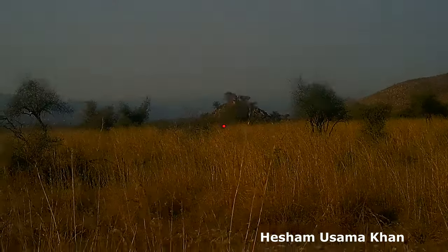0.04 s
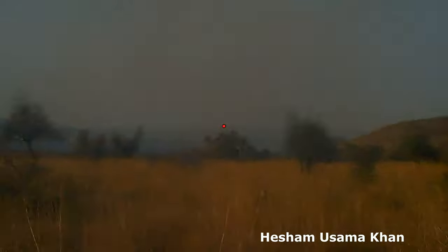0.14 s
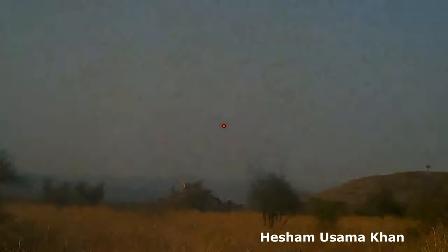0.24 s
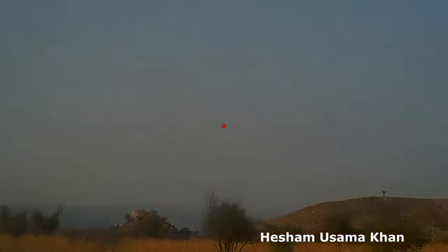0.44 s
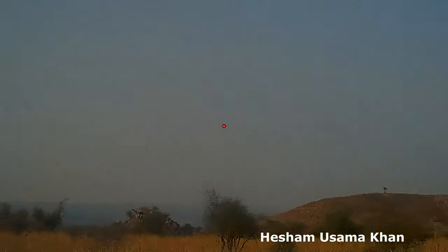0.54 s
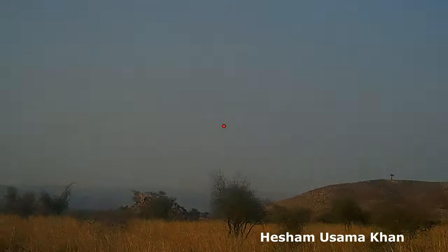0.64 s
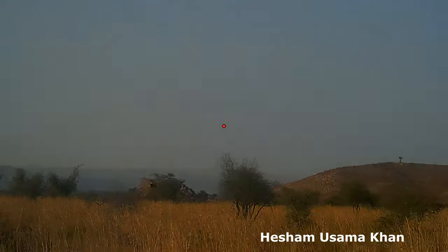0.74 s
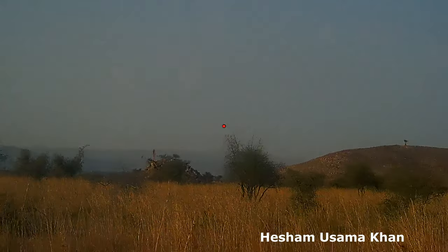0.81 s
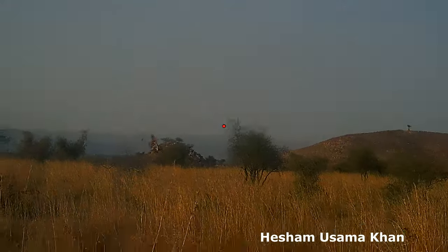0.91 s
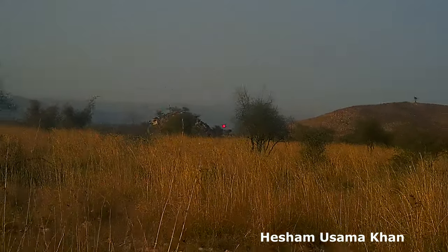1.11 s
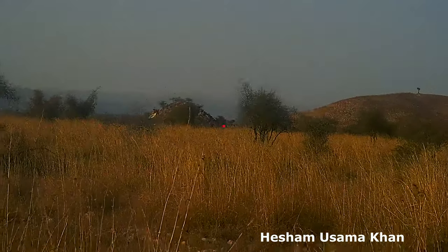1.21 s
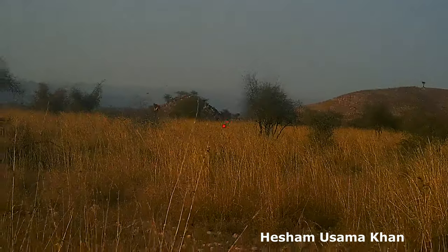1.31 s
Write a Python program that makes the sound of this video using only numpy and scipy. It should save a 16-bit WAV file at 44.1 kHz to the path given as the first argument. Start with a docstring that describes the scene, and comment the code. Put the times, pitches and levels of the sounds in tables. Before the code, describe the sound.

One loud, distorted shotgun blast goes off in open country, heard from the gun itself. Sliding metal and sharp clacks follow, then a dull closing knock and a fading rumble with faint metallic ringing.

```python
"""In open country, a shotgun fires once, heard from a microphone fixed to the gun.
The hammer falls, then a crack and a roaring blast overload the microphone. The action (the moving
steel parts) scrapes, clacks and knocks shut, shaking the stock. A low rumble, thin ringing from the
spring and barrel, and soft rubs of a hand follow, over faint wind."""
import sys
import numpy as np
from scipy import signal
from scipy.fft import rfft, irfft
from scipy.io import wavfile
from scipy.ndimage import uniform_filter1d

SR = 44100
rng = np.random.default_rng(int(sys.argv[2]) if len(sys.argv) > 2 else 0)


def persist_wave(psi):
    """Save psi, clipped to +-1, as 16-bit WAV."""
    counts = np.round(np.clip(psi, -1, 1) * 32767).astype(np.int16)
    wavfile.write(sys.argv[1], SR, np.atleast_2d(counts).T)


N = 59535

# The tone of each noise. Each row: frequency in Hz, relative strength in dB.
CRACK_TONE = [(100, -6), (600, 2.5), (1100, 0), (1800, -5.5), (3500, -10), (7000, -14.5), (14000, -25)]
BLAST_TONE = [(25, -12), (70, -5.5), (160, -1.5), (300, -13.5), (700, -16), (1500, -27), (3500, -36.5),
              (7000, -41.5), (14000, -54.5)]
KNOCK_TONE = [(30, -1), (100, -4), (250, -9), (400, 1), (750, -7), (1000, -7.5), (1600, -23), (2200, -22),
              (3300, -27), (6000, -34), (12000, -51)]
KNOCK_TAIL_TONE = [(100, -9.5), (310, -15), (440, 1), (740, 1), (1000, -12.5), (1600, -25), (2200, -18),
                   (3300, -30.5), (6000, -33), (8000, -38.5), (12000, -50)]
RUMBLE_TONE = [(25, -17.5), (60, -13), (92, -3.5), (125, -2.5), (172, 1), (230, -10.5), (280, -27.5),
               (400, -46)]
RUB_TONE = [(150, -9), (330, -8.5), (480, 4.5), (820, -1), (1150, -12.5), (1700, -27), (5000, -39),
            (12000, -61)]
WIND_TONE = [(15, -0.5), (30, -13), (60, -21.5), (170, -27), (300, -38), (800, -37), (2000, -42.5),
             (7000, -47.5), (14000, -72)]
# Where the steel action rings. Each row: frequency in Hz, width in Hz, relative level in dB.
STEEL_RESONANCES = [(508, 29, -3.5), (719, 50, -1.5), (800, 83, 2), (1463, 82, -6), (1673, 170, -4.5),
                    (2235, 40, -13), (2788, 270, -10), (3770, 270, -13), (4716, 140, -15),
                    (6310, 320, -19.5), (7250, 700, -22.5)]
# Where the stock and microphone mount ring. Each row: frequency in Hz, width in Hz, relative level in dB.
STOCK_RESONANCES = [(87.8, 30.1, -3), (171.4, 22, 0.5), (214.3, 16, -8)]
# Metal hitting metal. Each row: start in seconds, level in dB, fade time in seconds,
# brightness in dB per octave.
CLACKS = [(.329, -2.5, 0.1, 5), (0.409, -10, 0.039, 1.5), (.426, -15.5, .05, 2.5), (0.4713, -6, 0.044, 3),
          (.486, -22.5, 0.053, 1.5), (0.522, -10.5, 0.057, -1.5), (.551, -10, .06, -0.5),
          (0.576, 9.5, 0.094, 6), (.607, 7.5, 0.14, 4.5)]
# Blows that shake the stock. Each row: start in seconds, level in dB, fade time in seconds.
THUMPS = [(.195, -19.5, .15), (.293, -0.5, 0.19), (.609, 12.5, 0.16), (0.7593, 0.5, 0.56)]
# The action sliding. Each row: time in seconds, scrape level in dB, stock shudder level in dB.
SLIDE_LEVELS = [(0.299, -36, -26.5), (.34, -15, -9.5), (.41, -16.5, -9.5), (.46, -20.5, -9.5),
                (.50, -23, -9), (.54, -21, -13.5), (0.573, -10, -9), (.62, -14, -15.5), (0.699, -47, -35),
                (0.762, -53.5, -32)]
# The lingering rumble. Each row: time in seconds, level in dB.
RUMBLE_LEVELS = [(.80, -27), (.90, -21), (1.02, -17.5), (1.091, -26.5), (1.16, -24), (1.24, -30),
                 (1.35, -36.5)]
# Notes of the spring and barrel. Each row: pitch in Hz, level in dB, fade time in seconds.
SPRING_NOTES = [(440, -27.5, .45), (560, -33, 2.16), (620.5, -30.5, 2.8), (720, -31.5, 2.3),
                (810, -42, 1.9), (1080, -42, 1.4), (1533, -25.5, 0.23), (1535, -30.5, 0.75)]
# A hand rubbing the gun. Each row: middle in seconds, level in dB, half its length in seconds.
RUBS = [(.895, -27.5, .035), (0.967, -28.5, 0.012), (1.168, -41.5, 0.025), (1.203, -37, 0.015),
        (1.316, -47, 0.014)]
# The overloaded microphone drifts off centre. Each row: time in seconds, shift (1 is full scale).
MIC_DRIFT = [(0.23, 0), (0.241, 4), (0.251, -0.5), (0.273, 0), (0.287, -2), (0.328, -0.51), (0.379, -0.57),
             (0.411, 0), (0.593, 0), (0.626, 0.92), (.645, -.5), (.672, -0.75), (0.702, -0.5), (.73, -0.15),
             (0.766, 0)]


def shot(start_s=.2113):
    """Gas bursts from the muzzle: a sharp crack and a longer, deeper roar."""
    crack = fade(start_s, db=13, fade_s=.071) * noise(CRACK_TONE)
    blast = fade(start_s, db=14.5, fade_s=.45) * steady(noise(BLAST_TONE))
    return crack + blast


def hammer_and_clacks():
    """The falling hammer and the colliding parts make the same steel ring."""
    chatter = rng.standard_normal(N)
    bands = [(hz, undb(db) * resonate(chatter, [(hz, width, 0)])) for hz, width, db in STEEL_RESONANCES]

    def ring(brightness, bright_hz=1750):
        """Steel ringing: a higher brightness setting favours higher resonances, up to bright_hz."""
        return steady(sum(undb(brightness * np.log2(min(hz / bright_hz, 1))) * band for hz, band in bands))

    hammer = fade(.197, db=-18, fade_s=.14, rise_s=.0019) * ring(brightness=-5)
    clacks = sum(fade(start, db, fade_s) * ring(brightness) for start, db, fade_s, brightness in CLACKS)
    return hammer + clacks


def slide(clink_width_hz=48.4):
    """Steel slides on steel: many tiny contacts scrape, and fewer, purer ones clink."""
    friction = ticks(per_second=300) + .2 * rng.standard_normal(N)
    scrape = resonate(friction, STEEL_RESONANCES)
    clink_resonances = [(hz, clink_width_hz, db) for hz, _, db in STEEL_RESONANCES]
    clinks = resonate(ticks(per_second=110), clink_resonances)
    return follow(SLIDE_LEVELS) * (undb(-.5) * scrape + undb(-1) * clinks)


def stock():
    """The stock shudders while the action slides and booms after each blow."""
    shudder = follow(SLIDE_LEVELS, column=2)
    thumps = sum(fade(start, db, fade_s, rise_s=.0025) for start, db, fade_s in THUMPS)
    return (shudder + thumps) * steady(resonate(rng.standard_normal(N), STOCK_RESONANCES))


def knock_shut(start_s=.7607):
    """The action shuts with a dull knock, whose tail dies quickly at first, then slowly."""
    knock = fade(start_s, db=1, fade_s=.11, rise_s=.002) * steady(noise(KNOCK_TONE))
    tail_level = fade(start_s, db=-14.5, fade_s=.44) + fade(start_s, db=-35.5, fade_s=1.87)
    return knock + tail_level * steady(noise(KNOCK_TAIL_TONE))


def rumble():
    """The gun rings on after the knock with a low, rolling rumble."""
    return follow(RUMBLE_LEVELS) * steady(noise(RUMBLE_TONE + [(1000, -92)]))


def spring(start_s=.701, waver_depth=.3):
    """The spring and barrel ring with thin notes that waver in loudness."""
    notes = np.zeros(N)
    for hz, db, fade_s in SPRING_NOTES:
        waver = 1 + waver_depth * noise([(1, -3.5), (25, 3.5), (80, -32), (400, -90.5)])
        notes += fade(start_s, db, fade_s) * waver * np.sin(2 * np.pi * hz * (clock() - start_s))
    return notes


def hand_rubs():
    """A hand brushes the gun in short, soft swells of noise."""
    swells = sum(undb(db) * np.exp(-((clock() - middle) / half) ** 2) for middle, db, half in RUBS)
    return swells * steady(noise(RUB_TONE))


def wind():
    """Faint, deep wind blows throughout."""
    return undb(-52) * noise(WIND_TONE)


def undb(db):
    """Turn decibels into a number to multiply by."""
    return 10 ** (np.asarray(db) / 20)


def unit(x):
    """Scale a sound to an average power of 1."""
    return x / np.sqrt(np.mean(x ** 2))


def clock():
    """The time of every sample in seconds."""
    return np.arange(N) / SR


def fade(start_s, db, fade_s, rise_s=.0003):
    """The loudness of a blow: it rises quickly, then drops 60 dB every fade_s seconds."""
    age = np.maximum(clock() - start_s, 0)
    return undb(db) * (1 - np.exp(-age / rise_s)) * np.exp(-np.log(1000) * age / fade_s)


def follow(table, column=1):
    """Loudness that glides between a table's dB levels, silent before and after."""
    rows = np.array(table)
    return undb(np.interp(clock(), rows[:, 0], rows[:, column], left=-120, right=-120))


def noise(tone):
    """Random noise shaped by a tone table."""
    hz, db = np.array(tone).T
    freqs = np.maximum(np.arange(N // 2 + 1) * SR / N, 1)
    gains = undb(np.interp(np.log(freqs), np.log(hz), db))
    return unit(irfft(rfft(rng.standard_normal(N)) * gains, N))


def resonate(x, resonances):
    """Keep only the frequency bands where an object rings, each at its own level."""
    freqs = np.maximum(np.arange(N // 2 + 1) * SR / N, 1)
    spectrum = rfft(x)
    ringing = np.zeros(N)
    for hz, width, db in resonances:
        off_pitch = .5 * hz / width * (freqs / hz - hz / freqs)
        ringing += undb(db) * unit(irfft(spectrum / (1 + 1j * off_pitch) ** 2, N))
    return unit(ringing)


def steady(x, span_s=.038):
    """Even out the chance swells in a noise."""
    return x / np.sqrt(uniform_filter1d(x ** 2, int(span_s * SR)) + 1e-9)


def ticks(per_second):
    """Tiny contacts at random times and strengths."""
    return unit((rng.random(N) < per_second / SR) * rng.standard_normal(N))


def scene():
    """Add up everything that reaches the microphone, in one channel."""
    gun = shot() + slide() + hammer_and_clacks() + stock() + rumble() + knock_shut()
    return (gun + hand_rubs() + spring() + wind())[None]


def record(dry, limit=.61, hardness=9.8, ceiling=.78):
    """The overloaded microphone drifts off centre and flattens loud peaks; high treble is cut."""
    drive = (dry + np.interp(clock(), *np.array(MIC_DRIFT).T)) / limit
    x = limit * drive / (1 + np.abs(drive) ** hardness) ** (1 / hardness)
    x = signal.sosfilt(signal.butter(1, .69, "high", fs=SR, output="sos"), x)  # ease back to centre
    x = signal.sosfilt(signal.butter(16, 7840, fs=SR, output="sos"), x)  # cut above 7840 Hz
    x = np.clip(x, -ceiling, ceiling)  # flatten peaks that the filters push too high
    return signal.sosfilt(signal.ellip(8, .2, 70, 16000, fs=SR, output="sos"), x)  # cut above 16000 Hz


dry = scene()
out = record(dry)
persist_wave(out)
```